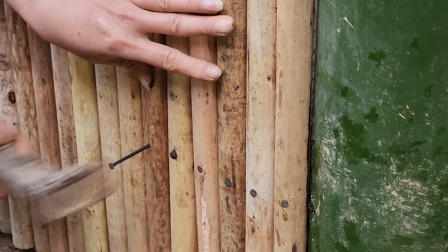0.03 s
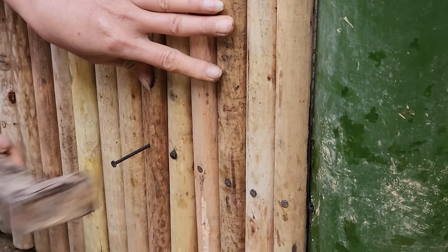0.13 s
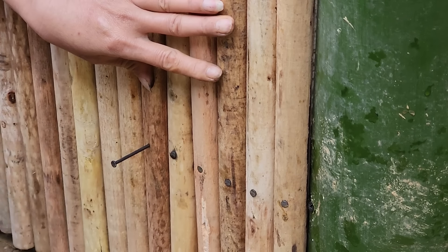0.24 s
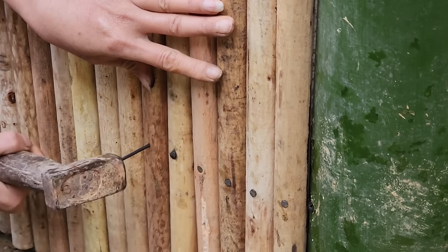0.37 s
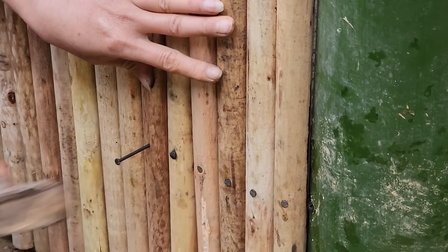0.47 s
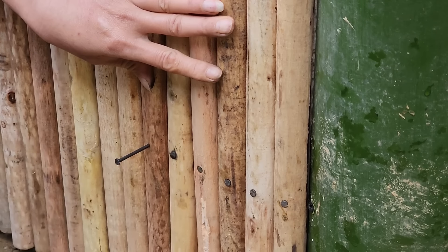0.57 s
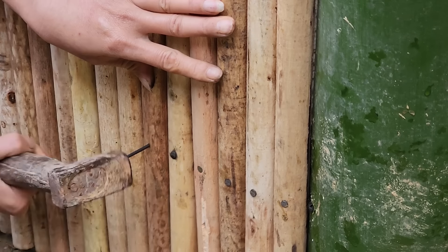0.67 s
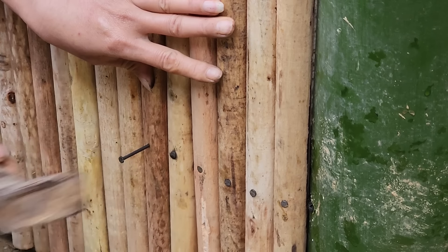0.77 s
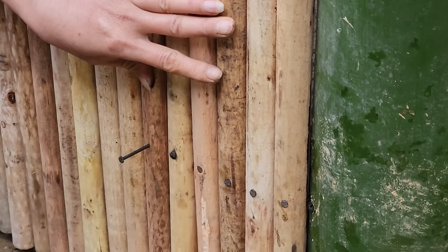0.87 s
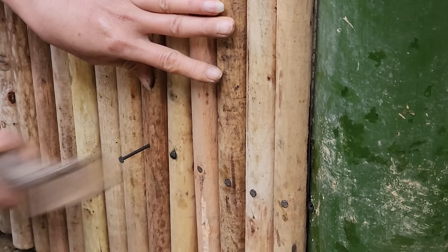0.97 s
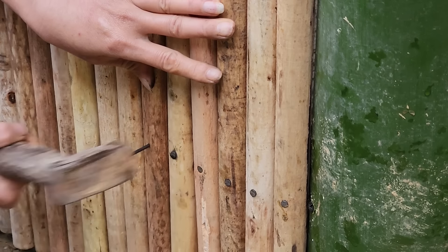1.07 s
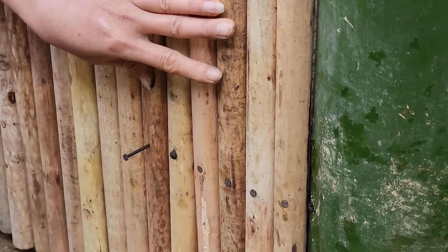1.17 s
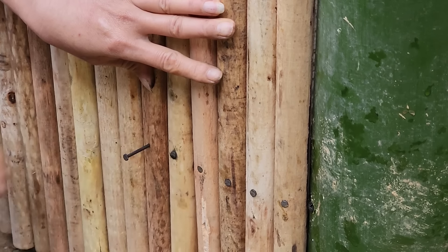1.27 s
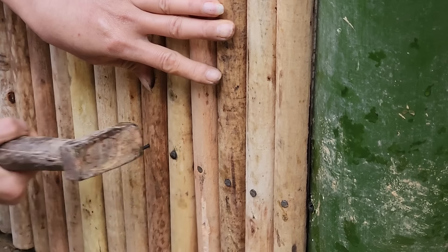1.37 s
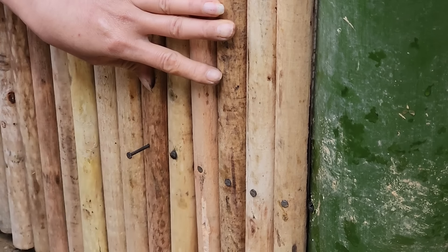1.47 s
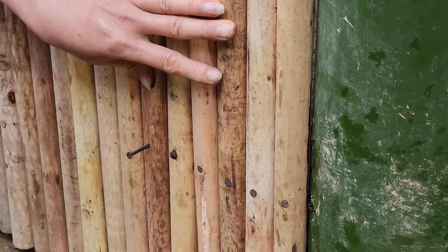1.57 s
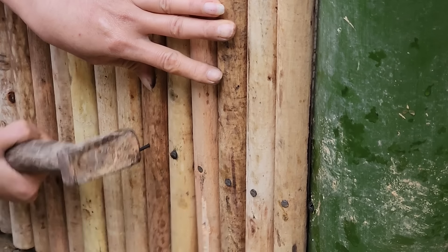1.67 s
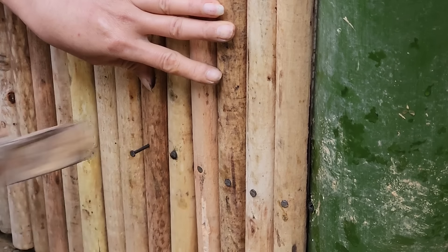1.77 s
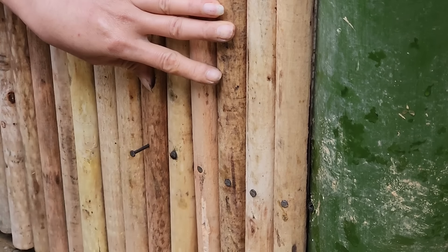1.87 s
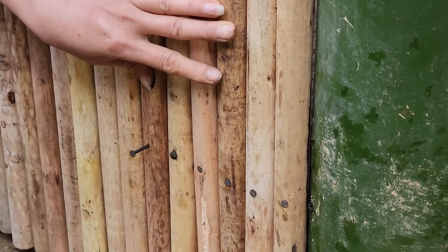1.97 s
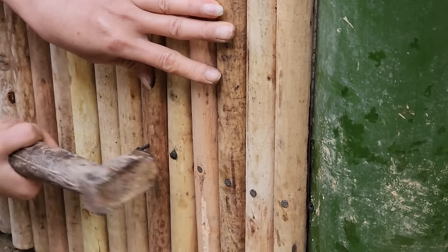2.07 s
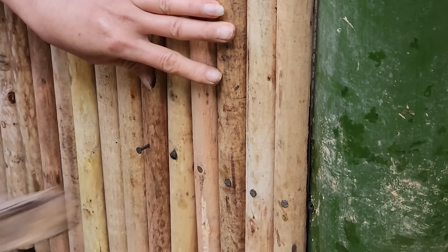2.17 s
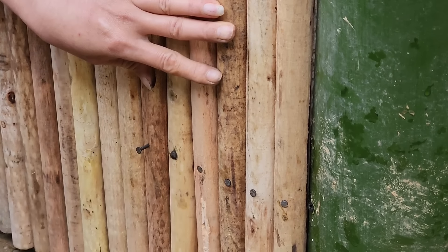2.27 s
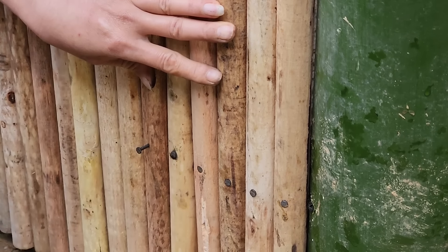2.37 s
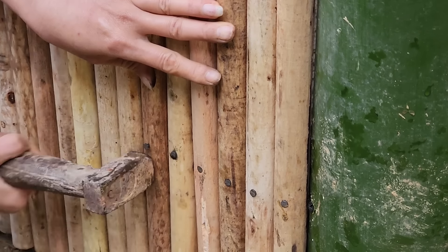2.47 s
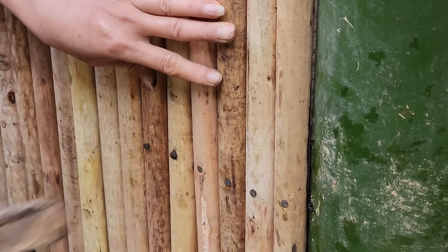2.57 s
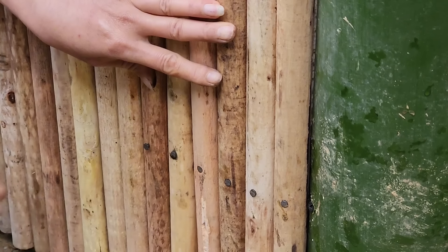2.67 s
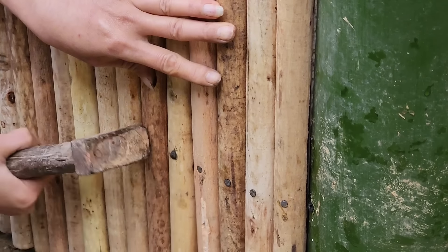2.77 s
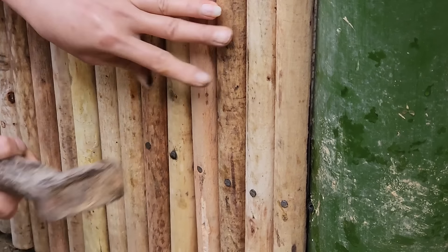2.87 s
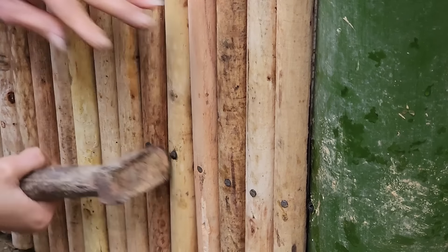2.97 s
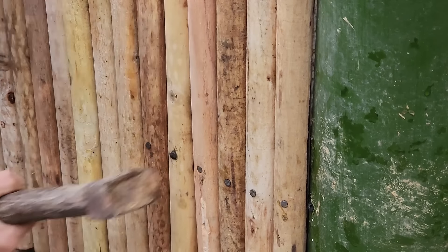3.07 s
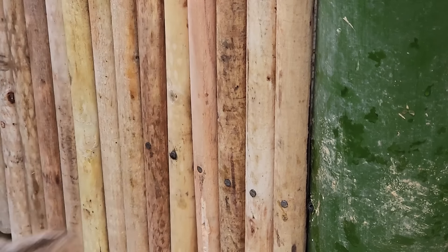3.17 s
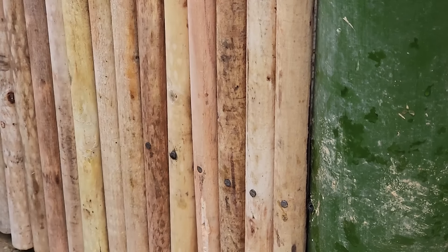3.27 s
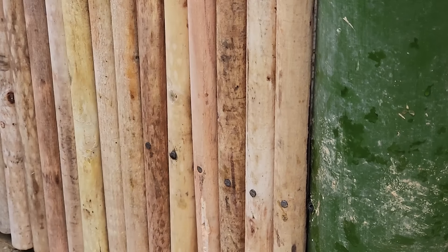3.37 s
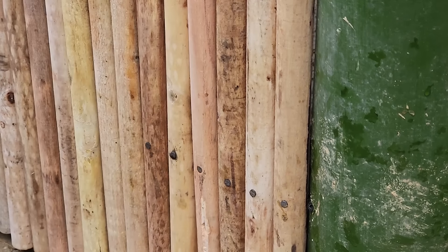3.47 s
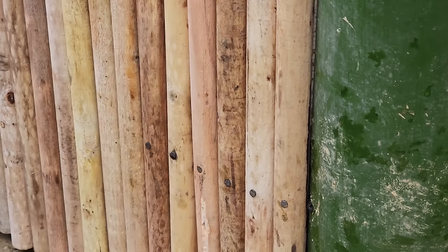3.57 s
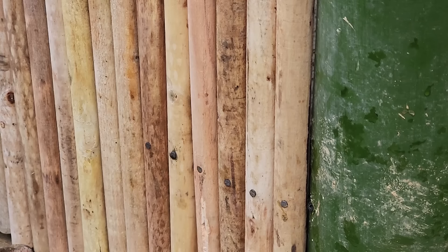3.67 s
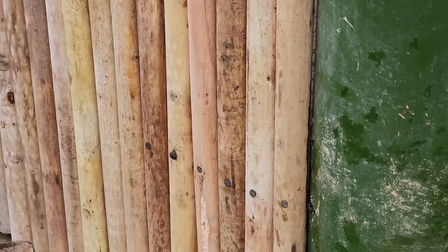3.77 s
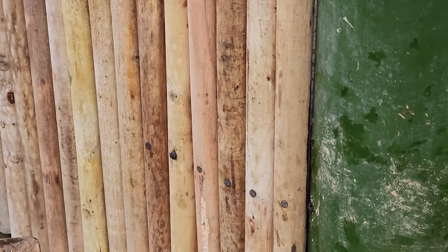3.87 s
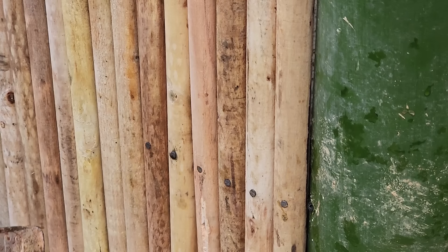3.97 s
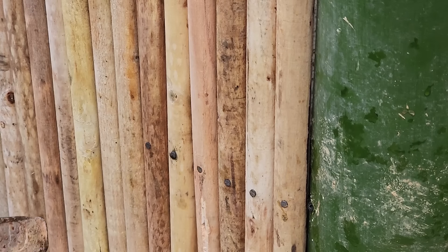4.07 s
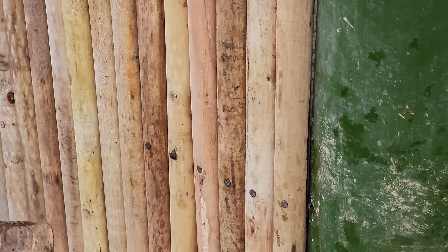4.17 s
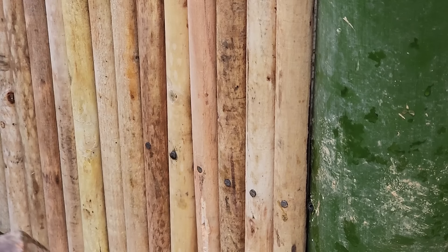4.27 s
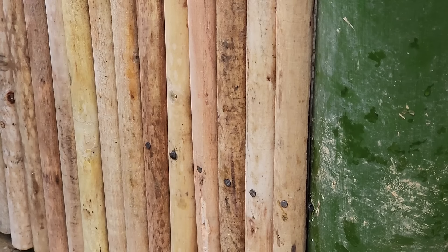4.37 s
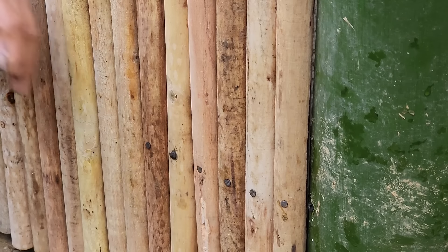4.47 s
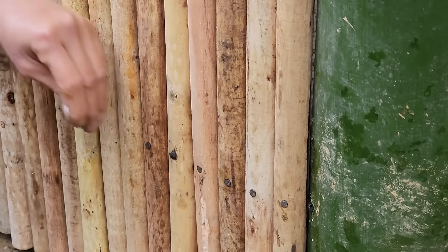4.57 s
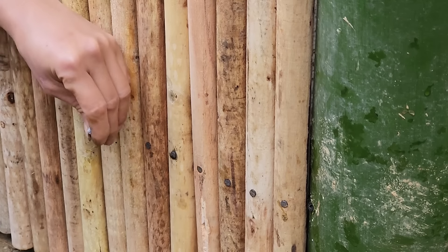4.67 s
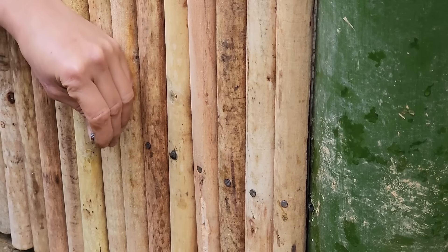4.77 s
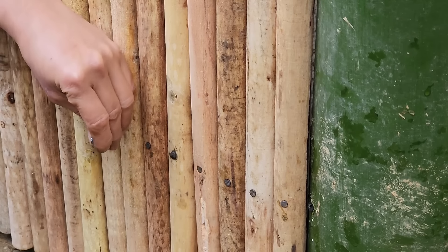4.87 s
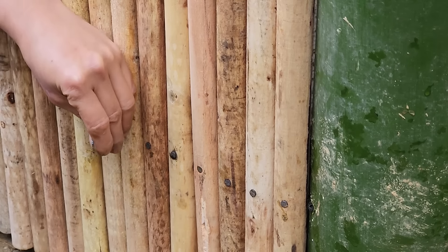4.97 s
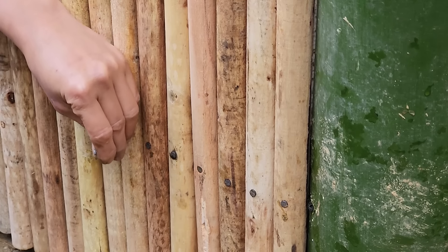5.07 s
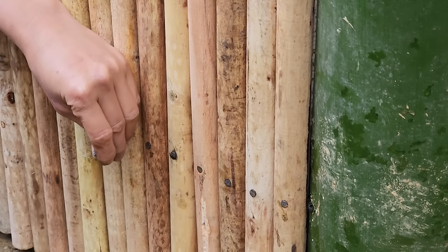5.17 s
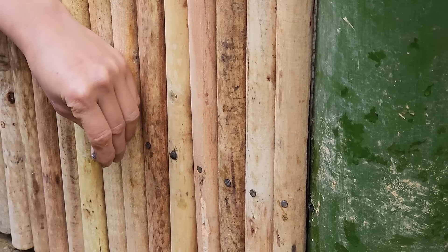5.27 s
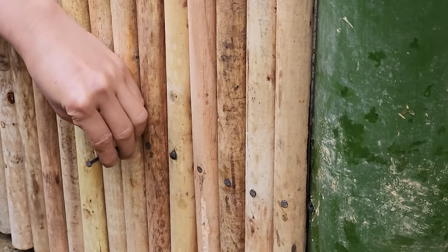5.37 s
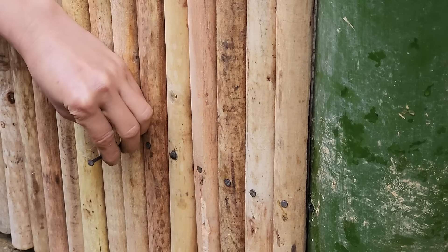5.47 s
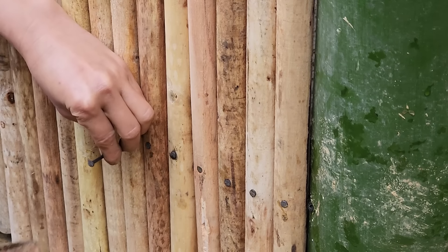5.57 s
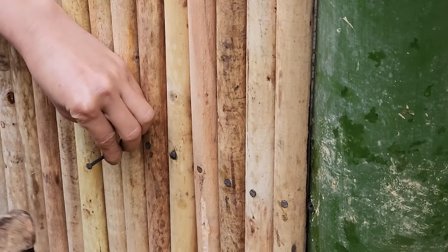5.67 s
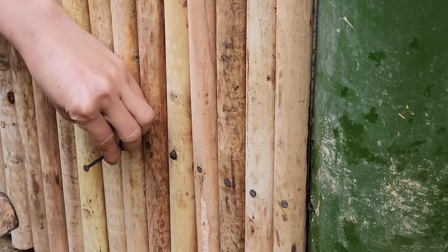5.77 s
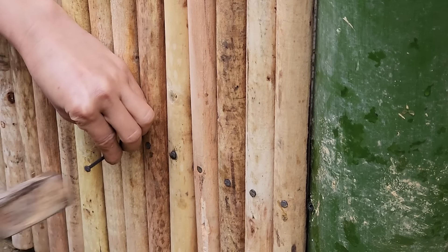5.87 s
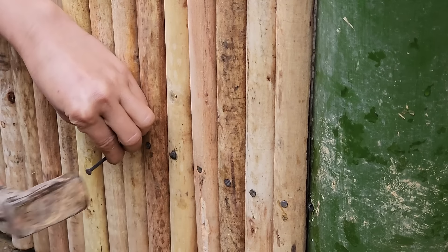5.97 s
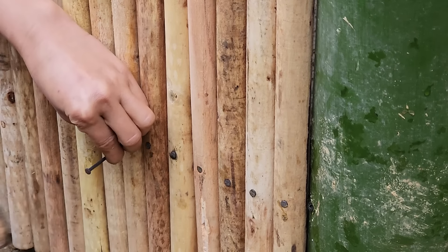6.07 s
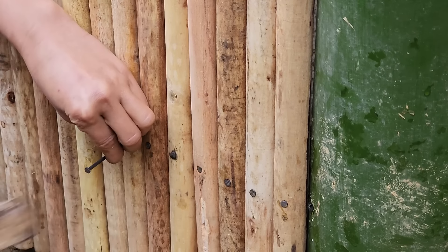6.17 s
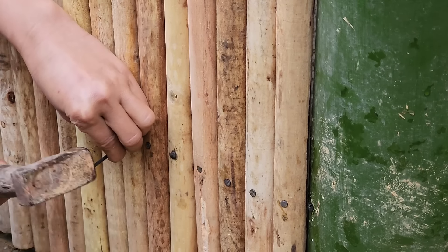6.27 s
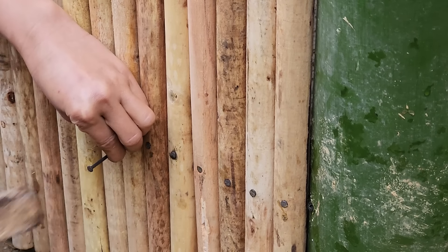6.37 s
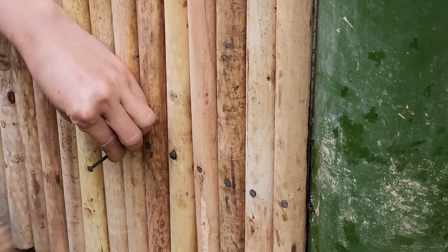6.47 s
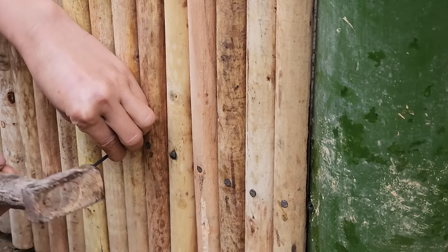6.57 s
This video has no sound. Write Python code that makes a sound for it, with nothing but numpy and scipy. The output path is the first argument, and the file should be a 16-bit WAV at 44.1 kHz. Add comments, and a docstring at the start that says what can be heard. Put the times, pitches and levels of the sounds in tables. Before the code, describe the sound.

A hammer drives a nail into a panel of thin wooden poles outdoors, sharp ringing cracks echoing off walls, then faint rustle, birdsong and a second nail started.

```python
"""A hammer drives nails into a panel of thin poles on a hollow base, in a yard under a faint, patchy hiss.
Each blow rings panel, wood and nail modes and cracks steel on steel in noise bursts; near walls throw it
back as delayed copies and a low rumble of decaying noise dies slowly. The first two blows precede time 0.
From 2.2 s a bird whistles in gliding or held sines, from 3.6 s cloth rustles in swells of bright noise,
from 4 s distant metal clinks in ringing modes; at 5.9 s a light tap sets a second nail, then two blows."""
import sys
import numpy as np
from scipy import signal
from scipy.io import wavfile

SR = 44100
rng = np.random.default_rng(int(sys.argv[2]) if len(sys.argv) > 2 else 0)


def to_wav(sig):
    """Store sig (one row per channel, or 1-D mono) as 16-bit WAV at the path in sys.argv[1].

    Samples outside -1..1 are clipped; the rate is SR.
    """
    pcm = np.clip(np.atleast_2d(sig), -1, 1) * 32767
    pcm = np.round(pcm).astype(np.int16)
    wavfile.write(sys.argv[1], SR, pcm.T)  # frames by channels


N = 292383
RUN_IN = round(0.6 * SR)   # samples ahead of time 0, for the blows that fall there


def from_db(db):
    """Amplitude gain of a level in dB."""
    return 10 ** (np.asarray(db) / 20)


def at_hz(rows, hz):
    """Columns of a table, interpolated on a log-frequency axis."""
    table_hz, *columns = np.transpose(rows)
    return [np.interp(np.log(hz), np.log(table_hz), column) for column in columns]


def band(x, low_hz, high_hz):
    """Band-pass."""
    return signal.sosfilt(signal.butter(2, [low_hz, high_hz], "band", fs=SR, output="sos"), x)


def convolve(x, response):
    """Fast convolution cut to the length of x."""
    return signal.fftconvolve(np.atleast_2d(x), np.atleast_2d(response), axes=1)[:, :np.shape(x)[-1]]


def waver(size, step):
    """Random level wander: a new normal value every step samples, straight lines between."""
    count = size // step + 2
    return np.interp(np.arange(size) / step, np.arange(count), rng.standard_normal(count))


def train(times_s, strength_db):
    """One click per hit."""
    clicks = np.zeros(RUN_IN + N)
    clicks[RUN_IN + np.round(times_s * SR).astype(int)] = from_db(strength_db)
    return clicks


def ring(drive, hz, t60_s):
    """Two-pole resonator: a unit click sets a decaying sine of height 1 ringing."""
    radius = from_db(-60 / (t60_s * SR))
    angle = 2 * np.pi * hz / SR
    poles = [1, -2 * radius * np.cos(angle), radius * radius]
    return signal.lfilter([0, np.sin(angle)], poles, drive + 1e-18)


def strike(times_s, strength_db, modes, spread_db, tilt_db=0, pivot_hz=5000, turn=-1):
    """Each hit drives each mode at a random strength, tilted in dB per octave; mode k is scaled by turn**k."""
    out = 0
    chance = rng.standard_normal((len(times_s), len(modes)))
    for k, (hz, level_db, t60_s) in enumerate(modes):
        tilt = tilt_db * np.log2(hz / pivot_hz)
        clicks = train(times_s, strength_db + level_db + spread_db * chance[:, k] + tilt)
        out = out + ring(clicks, hz, t60_s) * turn ** k
    return out


def shaken(drive, modes):
    """Modes kept ringing by a noisy drive."""
    return sum(from_db(level_db) * ring(drive, hz, t60_s) for hz, level_db, t60_s in modes)


def dying_noise(times_s, strength_db, t60_s, channels):
    """White noise that starts at each hit and dies away exponentially."""
    fade = signal.lfilter([1], [1, -from_db(-60 / (t60_s * SR))], train(times_s, strength_db) + 1e-18)
    return rng.standard_normal((channels, RUN_IN + N)) * fade


# left-right likeness of a diffuse field: (frequency [Hz], correlation [-1 to 1])
LEFT_RIGHT_LIKENESS = [(60, 0.99), (130, 1), (290, 0.92), (640, 0.61), (1410, -0.25), (3100, -0.1),
                       (6820, -0.11), (15000, 0.11)]


def noise_bands(size, per_octave):
    """Bands of stereo white noise, as a pair of close microphones hears a diffuse field."""
    edges_hz = 25 * 2 ** np.arange(0, 9.6, 1 / per_octave)
    white = rng.standard_normal((2, 2, size))   # neighbouring bands alternate between two noises
    for k, (low_hz, high_hz) in enumerate(zip(edges_hz, edges_hz[1:])):
        mid, side = band(white[k % 2], low_hz, high_hz)
        hz = np.sqrt(low_hz * high_hz)
        alike = np.clip(at_hz(LEFT_RIGHT_LIKENESS, hz)[0], -1, 1)
        yield hz, np.sqrt(1 + alike) * mid + np.sqrt(1 - alike) * side * [[1], [-1]]


LOW_LAG_SAMPLES, HIGH_LAG_SAMPLES = 4, 1


def near_pair(x):
    """Sound from the work reaches the right microphone a few samples later, the treble almost at once."""
    def half(kind):
        return signal.sosfilt(np.tile(signal.butter(4, 6800, kind, fs=SR, output="sos"), (2, 1)), x)

    low, high = half("low"), half("high")
    right = np.roll(low, LOW_LAG_SAMPLES) + from_db(-0.5) * np.roll(high, HIGH_LAG_SAMPLES)
    return np.array([low + high, right])


# blows; ring over crack falls as a nail sinks in; the tap that sets the second nail touches, then bites:
# (time [s], panel thump [dB], wood knock [dB], steel crack [dB], nail ring over crack [dB])
HAMMER_BLOWS = [(-0.56, -9.5, -12.5, -6, 1), (-0.245, -10.5, -10, -7, 1.5), (0.0646, -8, -8.5, -9.5, 3),
                (0.373, -9.5, -10, -9, 2.5), (0.6778, -8, -9, -9, 0.5), (1.0021, -9.5, -10.5, -8, 0.5),
                (1.3280, -9.5, -10, -9, 1), (1.6797, -9, -9, -9, -3), (2.0556, -11, -11.5, -6.5, -4),
                (2.4380, -12, -13.5, -8, 3), (2.7636, -11, -12, -8, -5), (2.9816, -12.5, -11, -11.5, -19),
                (5.9287, -13.5, -24.5, -29, 6.5), (5.9340, -19.5, -18, -41, 9),
                (6.2374, -7.5, -12.5, -14, 6), (6.5468, -6.5, -6.5, -12.5, 4)]
# panel modes: (frequency [Hz], level [dB], t60 [s])
PANEL_MODES = [(68, -22.5, 0.25), (109.9, -12, 0.12), (129.7, 1, .05), (175.2, -5.5, 0.04),
               (274.5, -8.5, .07)]
# wood modes: (frequency [Hz], level [dB], t60 [s])
WOOD_MODES = [(497.5, -6.5, 0.087), (579.5, -15, 0.22), (649.5, -4.5, 0.08), (779.3, -11, 0.09),
              (850, -10, 0.034), (1048, -12, 0.059), (1240, -13.5, .05), (1439, -19.5, 0.071),
              (1702, -11.5, 0.026), (1865, -14, 0.025), (2193, -13, 0.06), (2710, -7, 0.011),
              (3010, -10, 0.066), (3290, -4, 0.015)]
# nail modes: (frequency [Hz], level [dB], t60 [s])
NAIL_MODES = [(3550, -18.5, 0.01), (4550, -15.5, .02), (4880, -9.5, .018), (5330, -10.5, 0.039),
              (7500, -11.5, 0.051), (8480, -15, 0.017), (9260, -13, 0.014), (9870, -14, .015),
              (12000, -15, .015)]
# single reflections: (delay [s], level [dB], low edge [Hz], top edge [Hz])
WALL_ECHOES = [(0.0217, -12, 302, 5965), (0.0327, -13.5, 298, 5025), (.042, -16, 300, 4037),
               (0.063, -11, 45, 101.2), (.075, -12.5, 45.8, 111.9), (.115, -15.5, 70, 200),
               (.131, -17, 70, 194.5), (0.179, -21.5, 60.5, 198.8)]
EDGE_DB, EDGE_FOLLOWS = -1.0, 0.51   # top edge of the crack, share of ring over crack that it follows
SNAP_DB, SNAP_T60_S = 4.0, 0.0035   # first instant of steel on steel
PUSH_S, PUSH_DB, PUSH_FOLLOWS = 0.00048, 4, 0.4   # dip; share of crack over knock that it follows
THUMP_LAG_S = 0.0014


def hammer():
    """Direct blow from modes and noise bursts, its single echoes and its diffuse tail."""
    s, thump_db, knock_db, crack_db, free_db = np.transpose(HAMMER_BLOWS)
    ring_db = crack_db + free_db
    edge_db = EDGE_DB + EDGE_FOLLOWS * free_db
    crack_over_knock_db = crack_db - knock_db
    wood_tilt_db = 0.24 * crack_over_knock_db   # per octave: softer blows leave the upper modes quiet

    # the heavy panel follows the blow a moment late
    thump = band(strike(s, thump_db, PANEL_MODES, spread_db=2.0, turn=0.77), 93, 330)
    thump = np.roll(thump, round(THUMP_LAG_S * SR))

    knock = strike(s, knock_db - 10.5, WOOD_MODES, spread_db=3.0, tilt_db=wood_tilt_db, pivot_hz=705)
    splinter = band(dying_noise(s, knock_db - 0.5, 0.06, channels=1), 350, 1500)[0]

    nail = strike(s, ring_db - 6, NAIL_MODES, spread_db=1.5)
    crack_body = band(dying_noise(s, crack_db + 1.0, 0.016, channels=1), 1300, 10000)
    crack_edge = band(dying_noise(s, crack_db + edge_db, 0.0098, channels=1), 10000, 18000)
    snap = band(dying_noise(s, ring_db + SNAP_DB, SNAP_T60_S, channels=1), 7000, 13000)
    crack = (crack_body + crack_edge + snap)[0]

    # the panel jumps away: one short dip in pressure
    t = np.arange(SR // 100) / SR
    dip = -np.sin(np.pi * np.clip(t / PUSH_S, 0, 1))
    push = from_db(PUSH_DB) * convolve(train(s, knock_db + PUSH_FOLLOWS * crack_over_knock_db), dip)[0]

    blow = thump + knock + splinter + nail + crack + push

    echoes = 0
    for delay_s, level_db, low_hz, top_hz in WALL_ECHOES:
        echoes = echoes + from_db(level_db) * np.roll(band(blow, low_hz, top_hz), round(delay_s * SR))
    echoes[:SR // 5] = 0   # clears what np.roll wraps round

    # the scattered sound keeps the colour of the wood and of the nail
    wood_drive = dying_noise(s, knock_db + wood_tilt_db - 45.5, 0.28, channels=1)[0]
    wood_tail = shaken(wood_drive, WOOD_MODES)
    nail_tail = shaken(dying_noise(s, crack_db - 41, 0.2, channels=2), NAIL_MODES)
    return near_pair(blow + echoes + wood_tail) + nail_tail + yard(s, thump_db, knock_db, crack_db, edge_db)


# yard scatter: (frequency [Hz], level [dB per Hz], t60 [s])
YARD_SCATTER = [(59, -8, 0.99), (130, -8.5, 0.5), (278, -8.5, 0.46), (633, -6, 0.23), (1430, -9, .24),
                (3052, -18, 0.25), (5060, -13, 0.19), (6400, -22, 0.29), (7500, -24, 0.27),
                (9393, -25, 0.24), (11800, -25, 0.19), (16000, -24, 0.17)]
# slow rumble: (frequency [Hz], level [dB per Hz], t60 [s])
SLOW_RUMBLE = [(30.7, -37, 6.1), (67.6, -7, 5.54), (131, -17.5, 3.8), (197, -22, 3.42), (276, -22, 4.1),
               (440, -29.5, 2.5), (701, -26, 2.02), (1500, -36, 1.5), (5100, -58.5, 3.2),
               (16000, -71.5, 0.58)]
SCATTER_BUILD_S, RUMBLE_BUILD_S = 0.011, 0.031
BASS_EXTRA_BUILD_S, BASS_TOP_HZ = 0.026, 330


def yard(s, thump_db, knock_db, crack_db, edge_db):
    """Diffuse tail: the bass answers every blow alike, higher bands scatter anew each time."""
    t = np.arange(4 * SR) / SR
    bass, out = 0, 0
    tails = (YARD_SCATTER, SCATTER_BUILD_S), (SLOW_RUMBLE, RUMBLE_BUILD_S)
    for hz, noise in noise_bands(size=RUN_IN + N, per_octave=3):
        if hz < BASS_TOP_HZ:
            for table, build_s in tails:
                level_db, t60_s = at_hz(table, hz)
                rise = np.clip(t / (build_s + BASS_EXTRA_BUILD_S), 0, 1)
                bass = bass + noise[:, -len(t):] * rise * from_db(level_db - 60 * t / t60_s)
            continue
        steel = np.clip(np.log2(hz / 900) / 1.7, 0, 1)   # share of the band that the crack drives
        uneven_db = 2.2 * rng.standard_normal(len(s))
        drive_db = (1 - steel) * knock_db + steel * crack_db + (hz > 10000) * edge_db + uneven_db
        power = train(s, drive_db) ** 2
        energy = 0
        for table, build_s in tails:   # reflections build up, then die away
            level_db, t60_s = at_hz(table, hz)
            rise = np.exp(-2 / (build_s * SR))
            arrived = signal.lfilter([1 - rise], [1, -rise], power + 1e-30)
            fall = from_db(-120 / (t60_s * SR))
            energy = energy + signal.lfilter([from_db(2 * level_db)], [1, -fall], arrived)
        clumps = from_db(2.3 * waver(size=RUN_IN + N, step=500))   # reflections come in clumps
        out = out + noise * np.sqrt(energy) * clumps
    return out + convolve(train(s, thump_db), bass)


# outdoor hiss spectrum: (frequency [Hz], relative level [dB])
HISS_SPECTRUM = [(18, -35.5), (30, 0), (68, -4.5), (125, -11.5), (201, -9), (378, -18.5), (659, -15),
                 (1450, -16), (2810, -21.5), (4900, -22), (11400, -36), (15200, -41), (16500, -54)]
HISS_RMS_DB = -63.5   # ahead of record()


def background():
    """Slightly patchy hiss: noise bands, each wandering in level."""
    hiss = 0
    for hz, noise in noise_bands(size=RUN_IN + N, per_octave=2):
        level_db = at_hz(HISS_SPECTRUM, hz)[0] + 0.72 * waver(size=N, step=5000)
        hiss = hiss + from_db(level_db) * noise[:, RUN_IN:]
    return from_db(HISS_RMS_DB) * hiss / np.sqrt(np.mean(hiss ** 2))


# whistles that rise to one top note: (time [s], length [s], level [dB])
RISING_WHISTLES = [(2.22, .05, -64), (4.325, .13, -72), (4.74, .07, -78), (5.565, .13, -70)]
# held whistles: (time [s], length [s], level [dB])
HELD_WHISTLES = [(4.9, .093, -59), (5.3, .11, -68), (5.41, .08, -59), (5.748, 0.087, -61),
                 (6.386, .094, -60)]
TOP_HZ, MEAN_RISE_HZ_PER_S, HELD_HZ = 4600, 3700, 3415
EDGE_POWER = 0.47   # of the half-sine envelope; below 1 is squarer


def bird():
    """Sine whistles that rise and level off, or hold; the air makes them waver."""
    whistles = [(s, length_s, TOP_HZ - MEAN_RISE_HZ_PER_S * length_s, TOP_HZ, level_db)
                for s, length_s, level_db in RISING_WHISTLES]
    whistles += [(s, length_s, HELD_HZ, HELD_HZ, level_db) for s, length_s, level_db in HELD_WHISTLES]
    out = np.zeros(N)
    for s, length_s, start_hz, end_hz, level_db in whistles:
        u = np.linspace(0, 1, round(length_s * SR))
        pitch_hz = start_hz + (end_hz - start_hz) * np.sin(np.pi / 2 * u)
        shape = np.abs(np.sin(np.pi * u)) ** EDGE_POWER
        tone = np.sin(2 * np.pi * np.cumsum(pitch_hz) / SR)
        out[round(s * SR):][:len(u)] += from_db(level_db) * shape * tone
    out = out * from_db(3.6 * waver(size=N, step=500))
    return np.array([np.roll(out, 8), out])   # left lags by 8 samples


# separate cloth rustles: (time [s], level [dB])
CLOTH_RUSTLES = [(3.606, -67), (3.703, -70), (3.718, -70), (3.755, -70), (3.83, -77), (3.913, -74),
                 (3.933, -66), (3.979, -75), (4.098, -78), (4.298, -78)]
RUSTLE_RISE_TAU_S, RUSTLE_T60_S = 0.0015, 0.078


def rustles():
    """Cloth: bright noise in quick swells that die away."""
    s, level_db = np.transpose(CLOTH_RUSTLES)
    rise = np.exp(-1 / (RUSTLE_RISE_TAU_S * SR))
    fall = from_db(-60 / (RUSTLE_T60_S * SR))
    poles = np.convolve([1, -rise], [1, -fall])
    swells = signal.lfilter([1 - rise], poles, train(s, level_db) + 1e-18)[RUN_IN:]
    return swells * band(rng.standard_normal((2, N)), 9000, 16000)


# clinks: (time [s], level [dB], brightness [dB per octave])
METAL_CLINKS = [(3.9981, -63, 6), (4.3997, -62, -4), (4.62, -60, -8), (4.889, -55.5, -2), (5.114, -56, 2),
                (5.4157, -52.5, -4), (5.7544, -62, -3)]
# clinking metal modes: (frequency [Hz], level [dB], t60 [s])
METAL_MODES = [(2410, -9, 0.27), (3047, 4, 0.26), (3180, -9, .3), (3740, -10, 0.27), (4490, -3, 0.38),
               (4900, -13, .15), (5650, -12, .15), (5760, -17, .12), (6170, -6, .07), (7350, 2, 0.14),
               (7690, 1, 0.13), (8620, -14, 0.078), (9160, -12, .08), (9700, -18, .08), (9870, -11, .08),
               (10670, -18, 0.072), (12600, -16, .06)]


def clinks():
    """Distant metal: a short bright tick and its ring, doubled by a ground echo, a little from the right."""
    s, level_db, tilt_db = np.transpose(METAL_CLINKS)
    tick = band(dying_noise(s, level_db - 11.0, 0.09, channels=2), 2500, 12000)
    metal = from_db(-7.5) * strike(s, level_db, METAL_MODES, spread_db=3.5, tilt_db=tilt_db)
    metal = metal + from_db(2.0) * np.roll(metal, round(0.007 * SR))
    return tick + np.array([np.roll(metal, 8), metal])   # left lags by 8 samples


def scene():
    """Everything at the microphones."""
    return (hammer() + clinks())[:, RUN_IN:] + background() + bird() + rustles()


CUTOFF_HZ = 16700


def record(dry):
    """The microphone drops the deepest bass, peaks are rounded, the top is cut."""
    thin = signal.sosfilt(signal.butter(2, 52, "high", fs=SR, output="sos"), dry)
    rounded = 1.048 * np.tanh(thin / 0.74)
    return signal.sosfilt(signal.cheby2(12, 60, CUTOFF_HZ, fs=SR, output="sos"), rounded)


dry = scene()
out = record(dry)
to_wav(out)
```